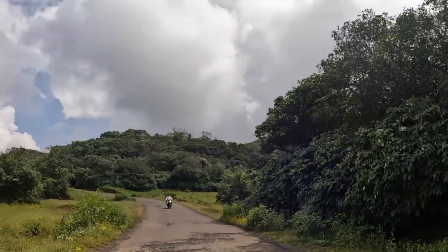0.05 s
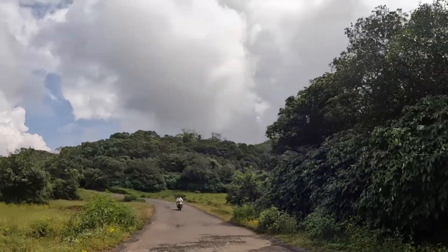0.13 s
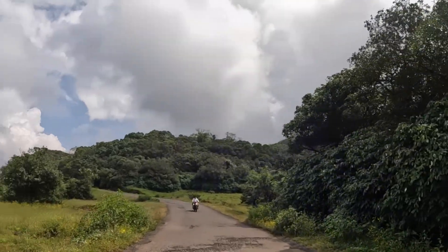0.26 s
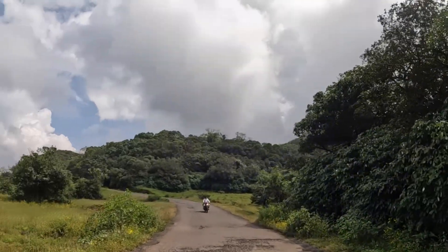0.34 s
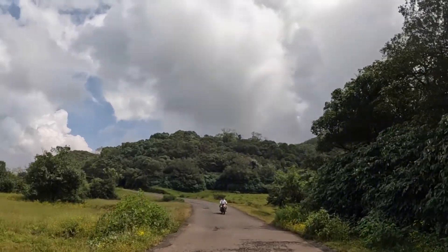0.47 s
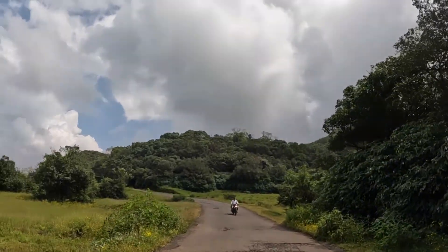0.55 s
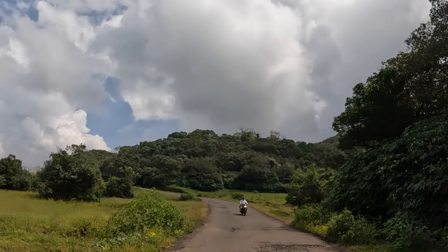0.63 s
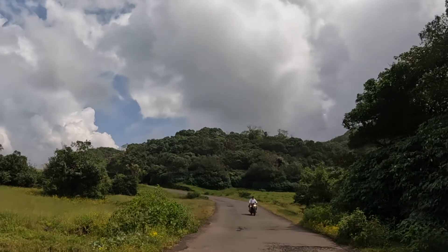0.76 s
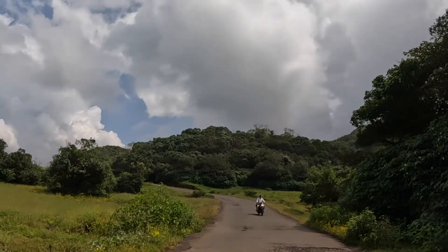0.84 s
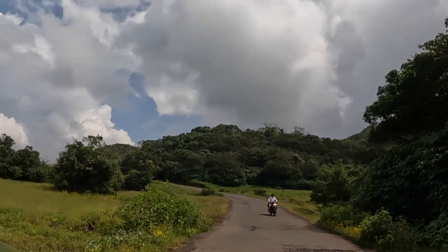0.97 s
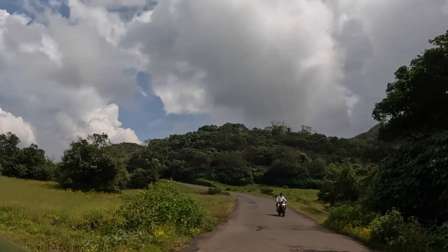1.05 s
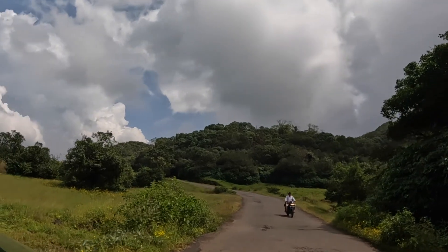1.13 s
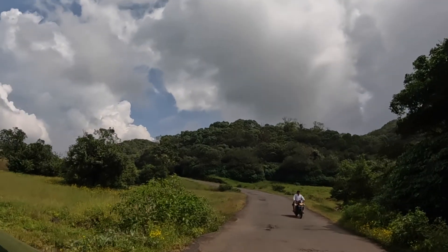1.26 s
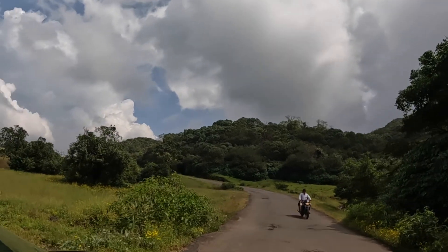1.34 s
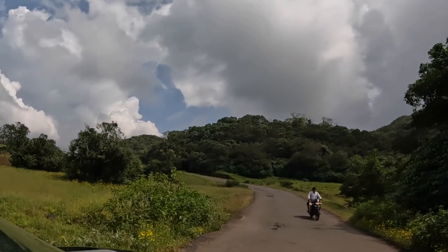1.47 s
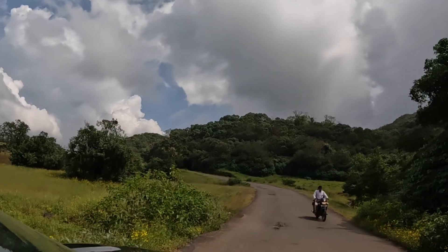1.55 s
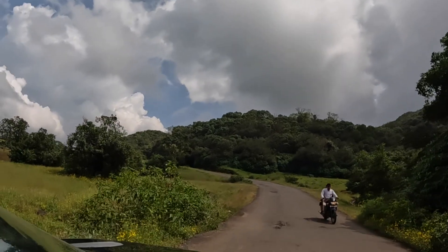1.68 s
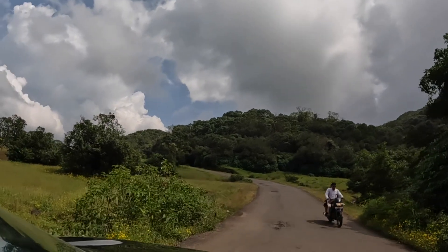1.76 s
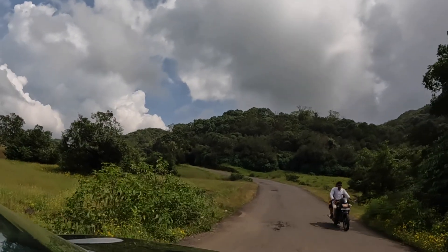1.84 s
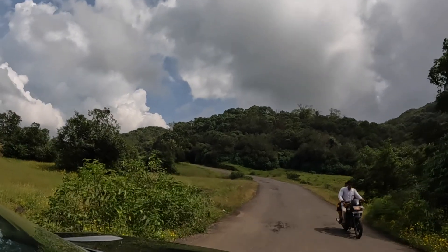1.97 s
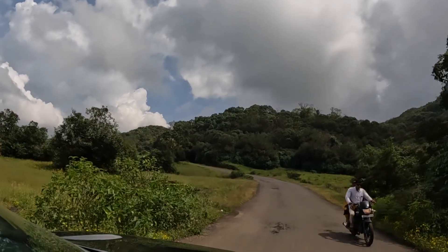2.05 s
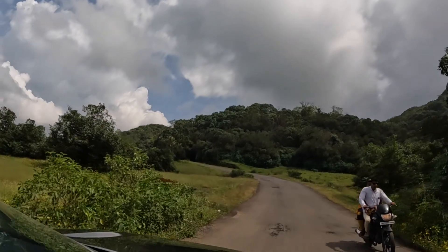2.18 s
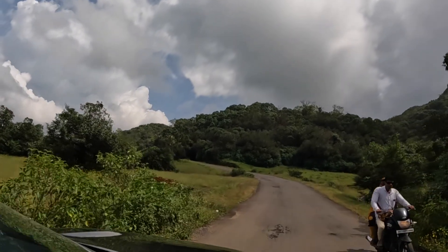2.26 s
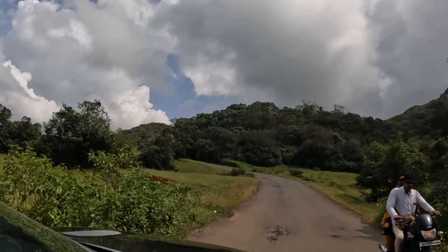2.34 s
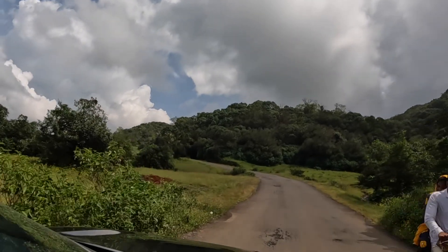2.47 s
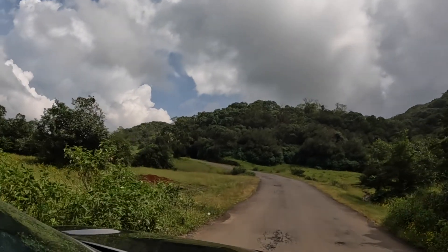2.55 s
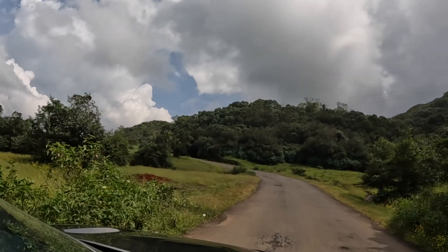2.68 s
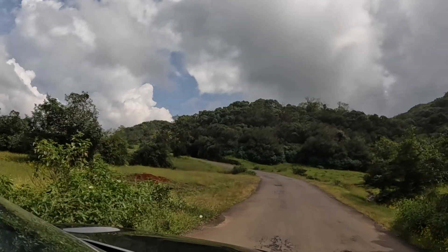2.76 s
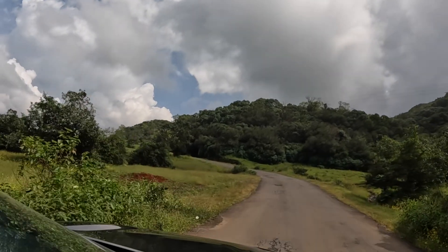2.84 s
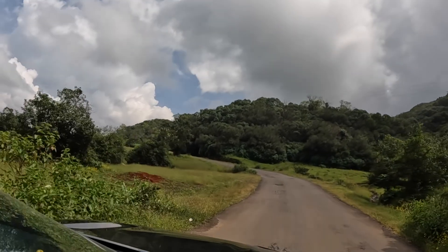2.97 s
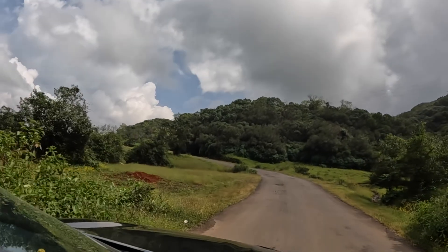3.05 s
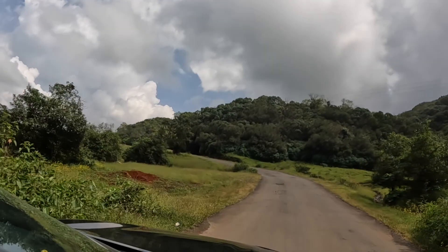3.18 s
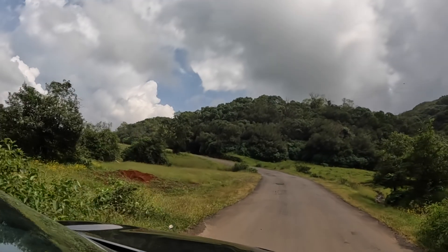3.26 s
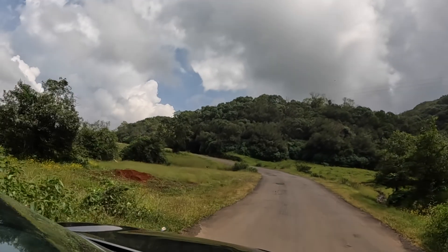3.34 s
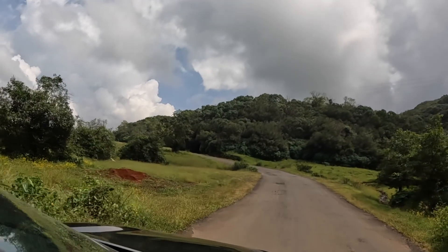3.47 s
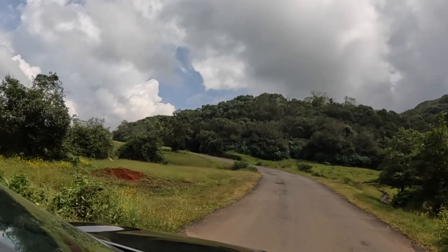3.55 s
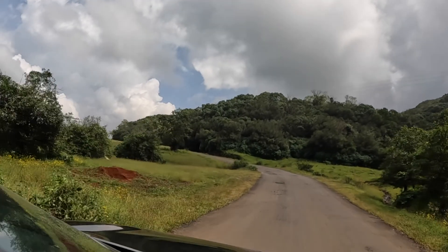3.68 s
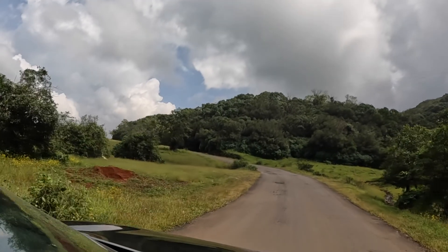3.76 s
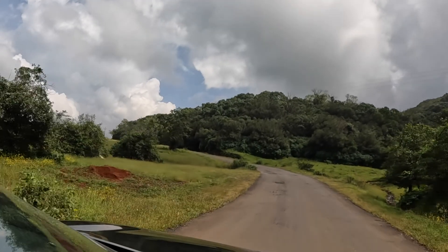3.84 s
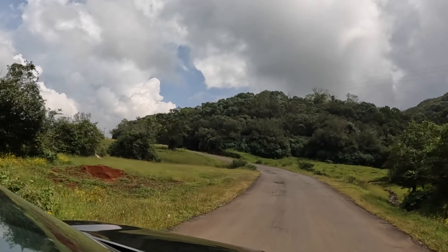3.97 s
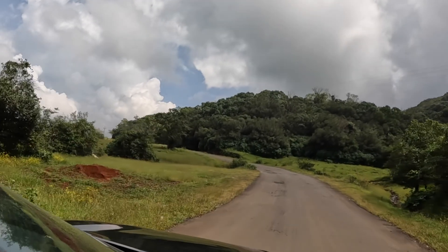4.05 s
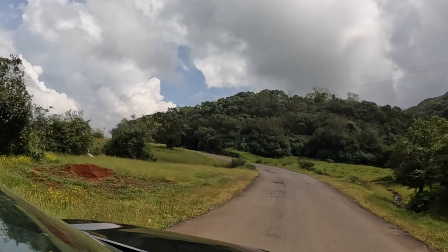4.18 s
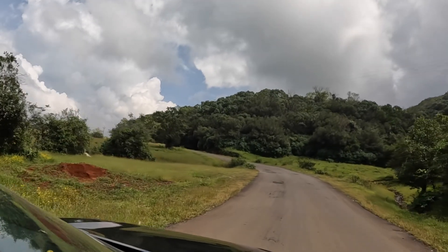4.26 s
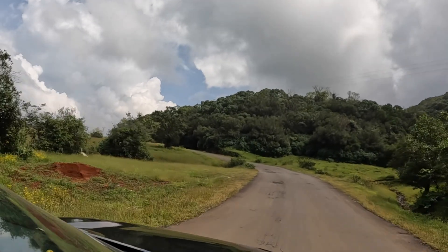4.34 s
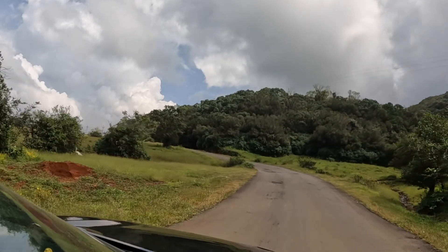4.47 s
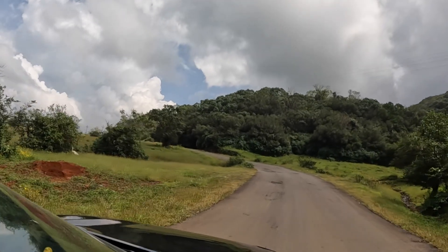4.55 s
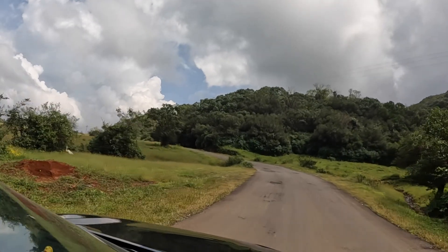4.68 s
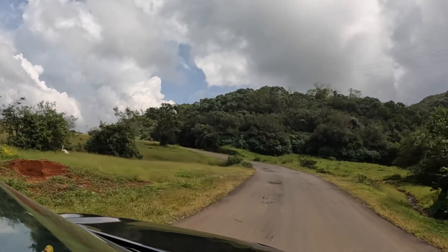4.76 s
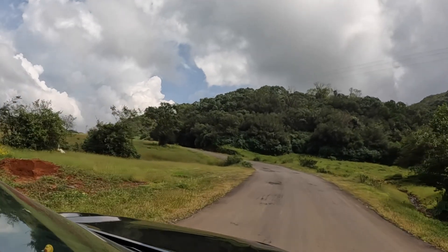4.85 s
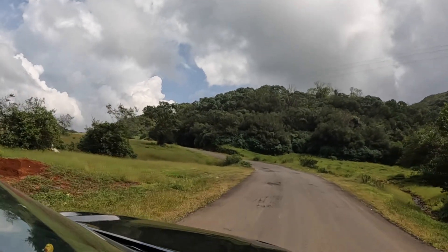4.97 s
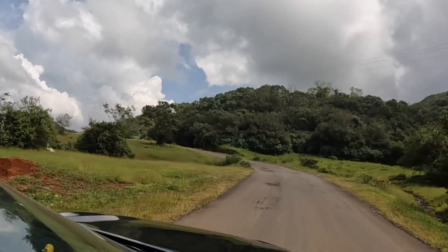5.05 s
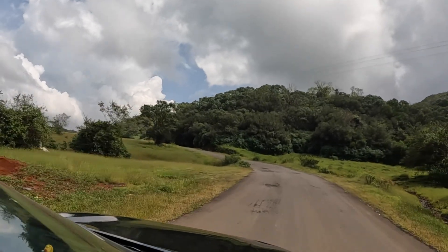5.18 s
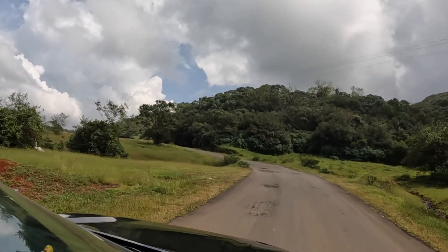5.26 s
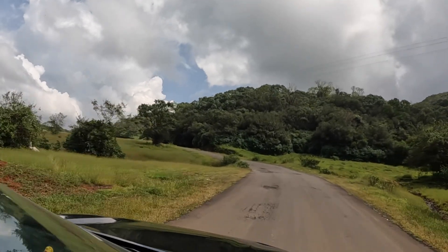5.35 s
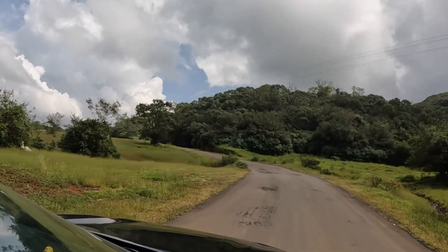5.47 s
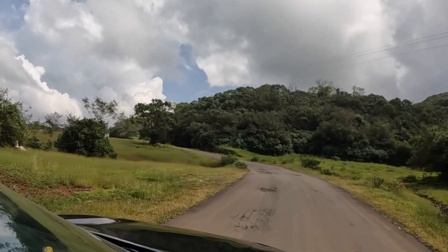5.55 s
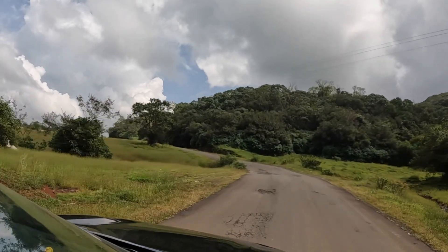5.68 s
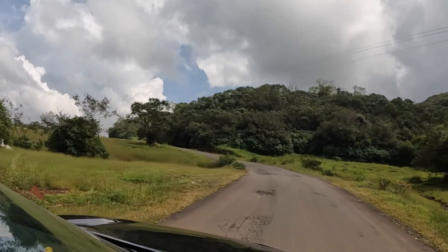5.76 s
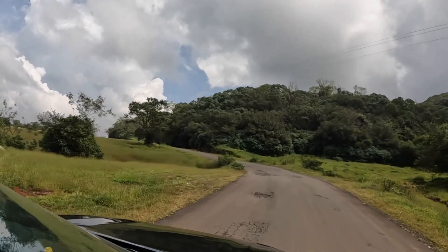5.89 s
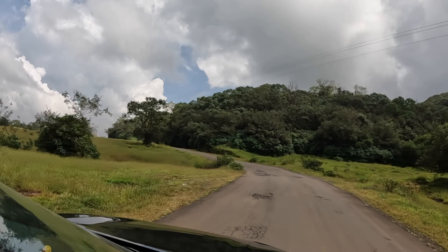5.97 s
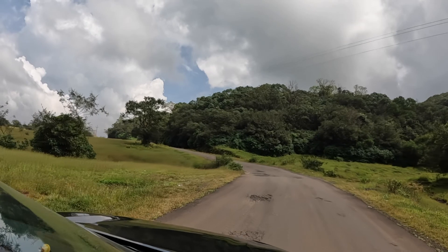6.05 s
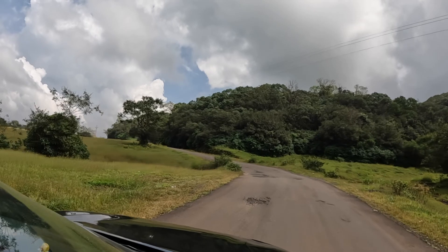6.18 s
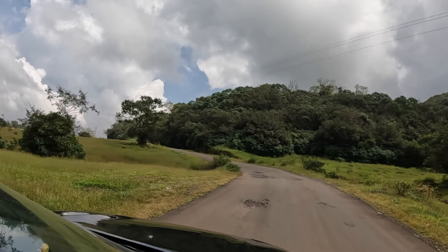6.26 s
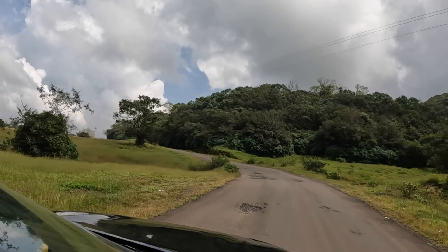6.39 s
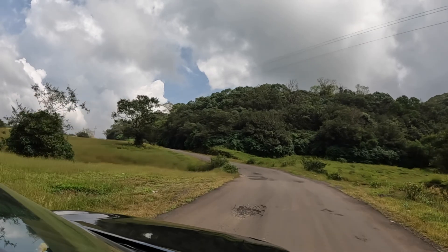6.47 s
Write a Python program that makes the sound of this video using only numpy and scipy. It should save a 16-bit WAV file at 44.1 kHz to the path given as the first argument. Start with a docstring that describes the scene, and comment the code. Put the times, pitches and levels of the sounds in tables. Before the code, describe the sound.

Inside a car on a broken country road, the cabin booms and shudders over bumps above the tyre noise and a low engine hum. Air hisses in gusts through a window gap. Midway a loose panel rattles loudly and a motorcycle sweeps past over crunching grit. The hiss fades, the engine pulls up, and the trim knocks with one brief high squeak. Pops and ticks crackle in the microphones as the car shakes.

```python
"""Inside a car on a broken country road: the cabin booms, tyres roar, the engine pulls up.
Air hisses in the resonances of a window gap; loose trim knocks, taps and rattles, with one high squeak.
Stray air flutters over the two microphones; pops and ticks crackle in them as the car shakes.
A motorcycle sweeps past over loose grit."""
import sys
import numpy as np
from scipy.fft import rfft, irfft, next_fast_len
from scipy.io import wavfile
from scipy.ndimage import map_coordinates

SR = 44100
rng = np.random.default_rng(int(sys.argv[2]) if len(sys.argv) > 2 else 0)


def to_wav(s):
    """Save 16-bit WAV."""
    ch = np.atleast_2d(s).T  # columns
    pcm = np.round(np.clip(ch, -1, 1) * 32767)  # PCM
    wavfile.write(sys.argv[1], SR, pcm.astype(np.int16))


N = 287532

# left-right likeness: f/Hz, correlation
COHERENCE = [(60, 0.99), (120, 1), (200, 1), (600, 0.99), (3000, 0.99), (8000, 1), (15000, 0.97)]
# noise spectra: f/Hz, relative density/dB
SHUDDER_SPECTRUM = [(18, -49), (30, 4), (42, -8), (62, -13.5), (85, -20.5), (120, -30.5), (170, -38),
                    (300, -92)]
RUMBLE_SPECTRUM = [(50, -42), (100, 6), (140, -3), (195, 0), (260, -7.5), (350, -11), (600, -36),
                   (1200, -63)]
ROAR_SPECTRUM = [(150, -9), (300, 1), (400, 2.5), (600, 2), (800, 0), (980, -1.5), (1250, -7), (1600, -15),
                 (2200, -16.5), (4000, -55), (9000, -69)]
CRUNCH_SPECTRUM = [(700, -11), (1800, 4), (3000, 0), (4300, -1.5), (5500, -6), (6400, -9), (7150, -3),
                   (8100, -12.5), (11000, -15), (15000, -16)]
SPRAY_SPECTRUM = [(2000, -12), (4000, 19), (5500, 11.5), (7500, 5), (10000, 7.5), (13000, 6), (14600, -2),
                  (16000, -8)]
EDDY_SPECTRUM = [(15, 6.5), (40, -8), (100, -24), (300, -36), (1000, -43), (8000, -63)]
MOTORCYCLE_SPECTRUM = [(150, -10), (400, 14), (700, 10), (1080, 15), (1400, 6), (2300, 3), (3200, 0.5),
                       (4600, -2.5), (6500, -16), (10000, -15.5), (15000, -20)]

# cabin boom: t/s, level/dB
BOOM_LEVEL = [(0, -13), (.7, -11.5), (.9, -20), (1.1, -10), (1.27, -19.5), (1.45, -12.5), (2.3, -12),
              (2.8, -15.5), (3.3, -15), (4.2, -13.5), (4.8, -14), (5.7, -13.5), (6.5, -12)]
# bumps and potholes: t/s, body shudder/dB, suspension rumble/dB
BUMPS = [(.04, -18, -35), (.35, -22.5, -32.5), (0.549, -15.5, -42), (.76, -31, -36.5), (1.04, -13.5, -34),
         (1.9, -13.5, -32), (2.18, -18, -59), (2.57, -16.5, -54), (2.64, -15.5, -32.5), (2.939, -16.5, -48),
         (3.031, -16, -37), (3.37, -18.5, -38), (4.38, -22, -39.5), (4.579, -20, -33.5), (4.78, -31, -41),
         (5.25, -24, -37.5), (5.36, -25, -38.5), (5.51, -26, -36.5), (6.038, -14, -33), (6.16, -24, -34.5),
         (6.39, -19, -47)]
# road coarseness: t/s, roar/dB
ROAR_LEVEL = [(0, -45.5), (.3, -43.5), (1.04, -41.5), (1.19, -45.5), (1.4, -42.5), (2.35, -44.5),
              (3.0, -48), (3.19, -51), (3.45, -45), (3.7, -46), (3.92, -48), (4.55, -42.5), (5.05, -48.5),
              (5.45, -47), (5.67, -49), (6.12, -42.5), (6.25, -49.5), (6.45, -44.5)]
# tyre treble: t/s, level/dB
CRUNCH_LEVEL = [(0, -52.5), (2.9, -52.5), (3.2, -57.5), (3.76, -52.5), (3.93, -57), (4.25, -54.5),
                (4.68, -54), (5.03, -58), (5.42, -57.5), (5.65, -62.5), (6.1, -53.5), (6.27, -60.5),
                (6.45, -58.5)]
# engine run: t/s, firing rate/Hz, load/dB
ENGINE_RUN = [(0, 38, -59), (2.6, 42, -47.5), (3.0, 42.53, -41), (3.45, 43.39, -42.5), (3.65, 43.86, -50),
              (3.95, 46.16, -40.5), (4.4, 49.39, -37), (5.2, 52.26, -42), (5.75, 54.45, -43),
              (6.07, 55.62, -36), (6.22, 56.46, -50), (6.5, 57.04, -43)]
# engine harmonics: multiple of firing rate, level/dB
FIRING_ORDERS = [(1, 14.5), (2, -0.5), (3, -12), (4, -13.5)]
# cabin resonances: f/Hz, half-width/Hz, lift/dB
CABIN_RESONANCES = [(125.5, 6.6, 4.5), (164.2, 6, 7), (199, 7.6, 6.5)]

# window gap modes: f/Hz, nominal width/Hz, level/dB
GAP_RESONANCES = [(923, 106, -6), (1420, 320, -9), (1910, 57, -11.5), (2234, 150, -6), (2654, 114, -9.5),
                  (2990, 140, -9.5), (3304, 110, -10), (3810, 240, -16), (4660, 190, -17.5)]
# gusts at the gap: t/s, rise/s, fall/s, hiss/dB, fine spray/dB, singing f/Hz
GAP_GUSTS = [(.28, 0.33, 0.45, -48.5, -58, 3840), (.58, 0.13, 0.098, -44, -67, 940),
             (.71, 0.061, 0.15, -41, -69, 1940), (.9, 0.12, 0.23, -45, -69, 970),
             (1.055, 0.46, 0.11, -35.5, -59.5, 960), (1.25, 0.13, 0.51, -39, -72, 2250),
             (1.38, 0.22, 0.5, -35.3, -47.5, 2250), (1.52, .15, 0.23, -47, -57, 2250),
             (1.68, .3, .16, -40.5, -51.5, 2250), (1.85, 0.15, 0.27, -40, -57, 2240),
             (2.01, 0.094, .2, -44.5, -64, 2240), (2.14, 0.16, 0.14, -42, -58, 2200),
             (2.35, 0.12, .15, -48.5, -70, 2600), (2.55, 0.38, 0.24, -44, -60, 2600),
             (3.089, 0.014, 0.032, -40, -45, 930), (3.48, 0.26, 0.17, -51.5, -61, 2630),
             (3.735, 0.052, .15, -67, -60, 3800)]
# upper edge of the hiss: t/s, f/Hz
HISS_EDGE = [(0, 5100), (0.8, 4500), (1.45, 4200), (2.1, 3300), (2.26, 3070), (2.6, 3020), (3.7, 2850)]
# near-whistles: t/s, rise/s, fall/s, level/dB
WHISTLE_SWELLS = [(2.17, .2, .16, -47.5), (2.5, .35, .35, -53), (3.48, .4, .35, -63.5)]
# eddies on the microphones: t/s, rise/s, fall/s, level/dB
EDDY_SWELLS = [(1.45, 0.16, 0.099, -20), (3.06, 0.1, 0.039, -18), (5.2, 0.69, 0.27, -27),
               (5.48, 0.2, 0.17, -19.5)]

# trim taps and a squeak: t/s, level/dB, f/Hz, nominal width/Hz, t60/s
TRIM_TAPS = [(3.239, -40, 550, 150, 0.1), (5.4825, -29, 1120, 600, 0.04), (5.483, -49, 6100, 600, 0.036),
             (5.503, -30, 780, 500, 0.035), (5.507, -45.5, 2440, 80, 0.11),
             (6.031, -46.5, 8900, 1487, 0.054)]
# fastener clicks: t/s, level/dB
FASTENER_CLICKS = [(4.958, -44), (5.622, -38), (5.6908, -43)]
# fastener and trim modes: f/Hz, level/dB, t60/s
FASTENER_MODES = [(1900, -3, .007), (3020, -1, .011), (5000, -10, .007), (6000, -7, .009),
                  (8500, -13, .006)]
TRIM_MODES = [(555, 4, 0.059), (1235, 0.5, 0.052), (1310, 3.5, 0.044), (1816, 4, 0.053), (2510, -10, 0.048),
              (3100, -7, 0.071), (5830, -25, .03)]
# trim knocks: t/s, ring/dB, ring time factor, scrape/dB, scrape t60/s
TRIM_KNOCKS = [(0.0807, -30.5, 0.75, -48, .035), (5.4807, -47, 0.3, -45, 0.046),
               (5.502, -40, 0.25, -47, 0.24)]
# loose panel modes: f/Hz, width/Hz, level/dB
PANEL_MODES = [(434, 300, -7), (690, 50, 3.5), (822, 24, 6), (885, 65, 2), (1178, 50, -2),
               (1610, 1800, -17), (2030, 220, -14), (2656, 220, -5.5), (3300, 290, -15)]
# panel slams: t/s, level/dB, favoured f/Hz
PANEL_SLAMS = [(2.578, -29, 900), (2.593, -28, 1200), (2.6058, -16.5, 850), (2.6095, -18.5, 1200),
               (2.615, -18, 1180), (2.622, -18.5, 875), (2.635, -19, 2200), (2.6415, -15, 810),
               (2.649, -19.5, 1180), (2.659, -20, 760), (2.675, -29, 720), (2.722, -31, 700)]
# clearest tick flurries: t/s, level/dB
TICK_FLURRIES = [(2.023, -19.5), (2.249, -22), (2.444, -21.5), (2.686, -17.5), (3.12, -23), (3.148, -27),
                 (3.22, -27), (3.334, -30), (3.868, -25), (3.98, -28), (4.172, -25.5), (4.797, -28.5),
                 (5.001, -30), (5.102, -30), (5.128, -29), (5.311, -30), (5.378, -23.5), (5.623, -27),
                 (5.691, -27.5), (5.72, -31.5), (5.82, -22.5), (6.204, -25.5), (6.228, -29.5), (6.293, -32),
                 (6.341, -27), (6.401, -24), (6.421, -27), (6.439, -25.5)]
# microphone pops: t/s, left/dB, right/dB, left lag/s
MIC_POPS = [(1.1586, -8.5, -5.5, .0027), (1.4086, -47, -10.5, 0), (1.5215, -8.5, -50, 0),
            (1.9523, -7, -5, .0017), (2.1766, -7.5, -7.5, .00195), (2.659, -11, -8.5, .002),
            (3.1001, -5.5, -30, 0), (3.5095, -8, -7.5, .00185), (3.822, -9, -6.5, .0019),
            (4.7275, -42, -8.5, 0), (4.9337, -10, -5.5, .00215), (5.5498, -9, -52, 0),
            (6.1829, -5.5, -5, .00125)]
# grit under the motorcycle: t/s, rise/s, fall/s, level/dB, f/Hz
GRIT_BURSTS = [(2.793, 0.03, 0.032, -31.5, 900), (2.835, .02, .03, -33, 1150),
               (2.812, 0.025, 0.03, -34, 3000), (2.818, 0.022, 0.055, -28.5, 510),
               (2.853, .025, 0.024, -27.5, 430), (2.857, .025, 0.025, -38, 3400),
               (2.894, 0.043, 0.031, -35, 2070), (2.918, 0.027, 0.05, -32, 474),
               (2.935, .02, .025, -34, 1050), (2.977, .02, 0.03, -40, 1100),
               (3.003, 0.015, .035, -44, 1600), (3.05, 0.041, 0.1, -39, 900)]


def amp(db):
    """Decibels to gain."""
    return 10 ** (np.asarray(db) / 20)


def unit(x):
    """Scale to rms 1."""
    return x / np.sqrt(np.mean(x ** 2) + 1e-20)


def clock(samples=N):
    """Sample times in seconds."""
    return np.arange(samples) / SR


def along(points, hz):
    """Interpolate (f/Hz, value) points on a log axis."""
    knots_hz, values = np.transpose(points)
    return np.interp(np.log(hz + 1), np.log(knots_hz + 1), values)


def curves(rows):
    """One per-sample curve for each column after the time."""
    times_s, *columns = np.transpose(rows)
    return [np.interp(clock(), times_s, column) for column in columns]


def swell(peak_s, rise_s, fall_s):
    """Gain peaking at 1: up 20 dB in rise_s, down 20 dB in fall_s."""
    t = clock() - peak_s
    return amp(-20 * np.maximum(-t / rise_s, t / fall_s))


def wobble(rate_hz):
    """Smooth random curve, rate_hz knots a second."""
    knots = rng.standard_normal(int(N * rate_hz / SR) + 4)
    return map_coordinates(knots, [np.arange(N) * rate_hz / SR])


def filtered(x, response):
    """Apply a complex frequency response."""
    size = next_fast_len(N + SR // 2)
    return irfft(rfft(x, size) * response(np.fft.rfftfreq(size, 1 / SR)), size)[..., :N]


def resonance(f, centre_hz, width_hz):
    """Causal band-pass response."""
    return 1j * f * width_hz / (centre_hz ** 2 - f ** 2 + 1j * f * width_hz)


def bell(offset, width):
    """Gaussian weight, 1 at zero offset."""
    return np.exp(-(offset / width) ** 2)


def noise_pair():
    """White noise at two close microphones, nearly alike."""
    def mid_side(f):
        angle = np.arccos(np.clip(along(COHERENCE, f), -1, 1)) / 2
        return np.array([np.cos(angle), np.sin(angle)])
    mid, side = filtered(rng.standard_normal((2, N)), mid_side)
    return np.array([mid + side, mid - side])


def rush(spectrum):
    """Coloured stereo noise, rms 1."""
    return unit(filtered(noise_pair(), lambda f: amp(along(spectrum, f))))


def add(track, at_s, sound):
    """Mix a sound into a track."""
    start = max(round(at_s * SR), 0)
    span = track[start:start + len(sound)]
    span += sound[:len(span)]


def ride(boom_hz=21, sway_db=2, upset_db=-15, shake_db=-24.5, shake_db_per_s=0.11):
    """The lowest cabin mode booms; bumps break it up, shake the body and rumble in the suspension."""
    t = clock()
    bump_power = sum(np.outer(amp(levels_db), swell(at_s, rise_s=0.16, fall_s=0.11)) ** 2
                     for at_s, *levels_db in BUMPS)
    shudder, rumble = np.sqrt(bump_power)
    boom = np.sqrt(2) * np.sin(2 * np.pi * np.cumsum(boom_hz * (1 + 0.1402 * wobble(12))) / SR)
    boom_gain = amp(curves(BOOM_LEVEL)[0] + sway_db * wobble(7)) * np.minimum(t / 0.05, 1)
    boom_gain /= np.hypot(1, shudder / amp(upset_db))
    shudder = np.hypot(shudder, amp(shake_db + shake_db_per_s * t))  # grows with speed
    rumble = np.hypot(rumble, amp(curves(ROAR_LEVEL)[0] + 3.5))  # follows the road
    return boom_gain * boom + shudder * rush(SHUDDER_SPECTRUM) + rumble * rush(RUMBLE_SPECTRUM)


def tyres(coarse_db=1, crunch_gain_db=-1, patchy_db=1.88, grain_db=2):
    """Tyres roar on coarse asphalt; the tread crunches over fine grit."""
    roar = amp(curves(ROAR_LEVEL)[0] + coarse_db * wobble(60)) * rush(ROAR_SPECTRUM)
    crunch_db = curves(CRUNCH_LEVEL)[0] + crunch_gain_db + patchy_db * wobble(25)
    crunch = unit(rush(CRUNCH_SPECTRUM) * amp(grain_db * wobble(350)))
    return roar + amp(crunch_db) * crunch


def engine(unsteady_db=2, imbalance=0.24, waver_hz=9):
    """Low orders pass the bulkhead, lifted by load and cabin modes; unequal cylinders make them beat."""
    firing_hz, load_db = curves(ENGINE_RUN)
    phase = 2 * np.pi * np.cumsum(firing_hz) / SR + 0.12 * wobble(10)
    out = np.zeros(N)
    for order, db in FIRING_ORDERS:
        lift_db = sum(peak_db / (1 + ((order * firing_hz - hz) / half_width_hz) ** 2)
                      for hz, half_width_hz, peak_db in CABIN_RESONANCES)
        beat = 1 + imbalance * np.sin(phase / 4 + rng.uniform(0, 2 * np.pi))
        gain = amp(load_db + db + lift_db + unsteady_db * wobble(waver_hz))
        out += gain * beat * np.sin(order * phase + rng.uniform(0, 2 * np.pi))
    return np.sqrt(2) * out


def draught(steady_db=-52.5, fade_from_s=1.6, lull_s=1.155, sing_db=4.5, flutter_db=1.34, leak=0.035):
    """Gusts hiss in the window gap's modes, with one lull; upper modes fade as the jet slows."""
    t = clock()
    edge_hz, = curves(HISS_EDGE)
    *_, hiss_db, spray_db, sung_hz = np.transpose(GAP_GUSTS)
    gust_power = np.array([swell(*gust[:3]) ** 2 for gust in GAP_GUSTS])
    steady = amp(steady_db - 20 * np.maximum(t - fade_from_s, 0) / 0.53)
    lull = 1 - np.exp(-((t - lull_s) / 0.078) ** 4)
    hiss = np.zeros(N)
    for hz, width_hz, db in GAP_RESONANCES:
        mode = unit(filtered(rng.standard_normal(N), lambda f: resonance(f, hz, 2 * width_hz) ** 2))
        mode = map_coordinates(mode, [np.cumsum(1 + 0.012 * wobble(7))], mode="mirror")  # pitch drift
        lift_db = sing_db * sum(bell(hz - k * sung_hz, 150) for k in (1, 2))
        flow = np.sqrt(amp(hiss_db + lift_db) ** 2 @ gust_power + steady ** 2)
        rolloff = leak + (1 - leak) / np.sqrt(1 + (hz / edge_hz) ** 30)
        edge_db = 4 * bell(hz - edge_hz + 350, 350)  # the mode just under the edge nearly whistles
        hiss += amp(db + edge_db + wobble(4.94)) * rolloff * flow * mode
    spray = np.sqrt(amp(spray_db) ** 2 @ gust_power) * rush(SPRAY_SPECTRUM)
    return (lull * hiss + spray) * amp(flutter_db * wobble(44.75))


def whistle(below_edge_hz=150, width_hz=100):
    """The jet almost whistles: a narrow, breathy band sliding down with the hiss edge."""
    edge_hz, = curves(HISS_EDGE)
    breath = unit(filtered(rng.standard_normal((2, N)), lambda f: 1 / (1 + (f / width_hz) ** 2)))
    phase = 2 * np.pi * np.cumsum(edge_hz - below_edge_hz) / SR
    gain = sum(amp(db) * swell(*timing_s) for *timing_s, db in WHISTLE_SWELLS)
    return gain * (breath[0] * np.cos(phase) + breath[1] * np.sin(phase))


def sizzle(level_db=-63, centre_hz=14600, width_hz=1700, flicker_db=4):
    """A thin, flickering band swells and fades above the hiss."""
    band = filtered(noise_pair(), lambda f: resonance(f, centre_hz, width_hz) ** 3)
    gain = amp(level_db) * swell(peak_s=2.12, rise_s=3.4, fall_s=1.5)
    return gain * unit(band * amp(flicker_db * wobble(130)))


def eddies():
    """Stray air tumbles over the microphones: low flutter, independent on each side."""
    gain = sum(amp(db) * swell(*timing_s) for *timing_s, db in EDDY_SWELLS)
    return gain * unit(filtered(rng.standard_normal((2, N)), lambda f: amp(along(EDDY_SPECTRUM, f))))


def trim_taps(attack_s=0.00048):
    """Trim gives short band-limited knocks and rings, plus one high squeak."""
    out, t = np.zeros(N), clock(SR // 5)
    for at_s, db, hz, width_hz, t60_s in TRIM_TAPS:
        band = unit(filtered(rng.standard_normal(N), lambda f: resonance(f, hz, width_hz) ** 2))
        envelope = amp(db - 60 * t / t60_s) * (1 - np.exp(-t / attack_s))
        add(out, at_s, envelope * band[SR:SR + len(t)])
    return out


def clicks(flight_s=0.0015, loss_db=4, contacts=3):
    """A loose fastener makes quick contacts, each with a short, bright ring."""
    out, t = np.zeros(N), clock(SR // 20)
    for at_s, db in FASTENER_CLICKS:
        for k in range(contacts):
            ring = sum(amp(mode_db + rng.normal(0, 1.7) - 60 * t / t60_s)
                       * np.sin(2 * np.pi * hz * rng.normal(1, 0.017) * t)
                       for hz, mode_db, t60_s in FASTENER_MODES)
            add(out, at_s + flight_s * (k + rng.uniform(-0.3, 0.3)), amp(db - loss_db * k) * ring)
    return out


def knocks(tap_gain_db=-2, cutoff_hz=2500):
    """Plastic trim taps, with new mode strengths each time, and scrapes as it slides back."""
    taps, scrape_gain, t = np.zeros(N), np.zeros(N), clock(SR // 4)
    for at_s, db, ring_factor, scrape_db, scrape_t60_s in TRIM_KNOCKS:
        ring = sum(amp(mode_db + rng.uniform(-1.4, 3.6) - 60 * t / (t60_s * ring_factor))
                   * np.sin(2 * np.pi * hz * t) for hz, mode_db, t60_s in TRIM_MODES)
        add(taps, at_s, amp(db + tap_gain_db) * ring)
        add(scrape_gain, at_s, amp(scrape_db - 60 * t / scrape_t60_s))
    rough = noise_pair() * amp(1.9 * wobble(910))
    friction = unit(filtered(rough, lambda f: 1 / (1 + 1j * f / cutoff_hz)))
    return taps + scrape_gain * friction


def rattle(gain_db=-1, chatter_t60_s=0.052, chatter_db=3, strike_db=-5, rasp_db=-6, favour_db=4):
    """A loose panel slams repeatedly: a hard strike, then chatter, favouring one resonance region."""
    out, t = np.zeros(N), clock(SR // 4)
    f = np.fft.rfftfreq(len(t), 1 / SR)
    damping = 1 / (1 + 1j * f / 4500) ** 2
    decay = amp(-60 * t / chatter_t60_s)
    decay_rms = np.sqrt(np.mean(decay ** 2))
    for at_s, db, favoured_hz in PANEL_SLAMS:
        chatter = decay * rng.standard_normal(len(t)) * amp(chatter_db * wobble(647)[:len(t)])
        strike = rng.choice([-1, 1]) * amp(strike_db) * np.linalg.norm(chatter)
        force = (rfft(chatter) + strike) * damping
        panel = sum((-1) ** k * amp(mode_db + favour_db * bell(hz - favoured_hz, 350))
                    * resonance(f, hz, width_hz) for k, (hz, width_hz, mode_db) in enumerate(PANEL_MODES))
        ring = unit(irfft(force * panel, len(t)))
        rasp = unit(irfft(force * resonance(f, 1260, 1600), len(t)))
        add(out, at_s, amp(db + gain_db) * decay_rms * (ring + amp(rasp_db) * rasp))
    return out


def pop_shape(rise_s, settle_s, swing, swing_hz, swing_decay_s):
    """A sudden step that swings back and settles."""
    t = clock(SR // 30)
    backswing = swing * np.exp(-t / swing_decay_s) * np.sin(2 * np.pi * swing_hz * t)
    return (np.exp(-t / settle_s) - backswing) * (1 - np.exp(-t / rise_s))


def ticks(gain_db=1, spread_s=0.005, loss_db=2.5, per_flurry=4, faint_from_s=1.5, faint_count=45):
    """Flurries of tiny microphone pops, scattered differently on each side, with faint ones between."""
    out = np.zeros((2, N))
    shape = pop_shape(rise_s=28e-6, settle_s=0.00035, swing=0.19, swing_hz=300, swing_decay_s=0.00072)
    faint_s = rng.uniform(faint_from_s, N / SR, faint_count)
    faint_db = rng.normal(-38, 3, faint_count)
    for at_s, db in [*TICK_FLURRIES, *zip(faint_s, faint_db)]:
        for side in out:
            for k, offset_s in enumerate(spread_s * (rng.random(per_flurry) - 0.5)):
                add(side, at_s + offset_s, rng.choice([-1, 1]) * amp(db + gain_db - loss_db * k) * shape)
    return out


def pops(pressure, gain_db=0.5):
    """Pops strike one microphone, or both a moment apart, against the cabin's pressure swing."""
    out = np.zeros((2, N))
    shape = pop_shape(rise_s=20e-6, settle_s=0.002, swing=3.4, swing_hz=208, swing_decay_s=0.00074)
    for at_s, left_db, right_db, lag_s in MIC_POPS:
        pop = -np.sign(pressure[round(at_s * SR)]) * amp(gain_db) * shape
        add(out[0], at_s + lag_s, amp(left_db) * pop)
        add(out[1], at_s, amp(right_db) * pop)
    return out


def grit(gain_db=-1, grains_per_s=1800, spread_db=2.6, width_ratio=0.51):
    """Loose grit crunches beside the car in bursts, each a dense shower of dull grains."""
    out = np.zeros(N)
    for *timing_s, db, hz in GRIT_BURSTS:
        impulses = (rng.random(N) < grains_per_s / SR) * rng.choice([-1, 1], N)
        grains = impulses * amp(spread_db * rng.standard_normal(N))
        shower = filtered(grains, lambda f: resonance(f, hz, width_ratio * hz) * resonance(f, 840, 4500))
        out += amp(db + gain_db) * swell(*timing_s) * unit(shower)
    return out


def motorcycle(pass_s=2.825, pass_db=-36.5, gap_m=1.56, closing_m_per_s=13.2, firing_hz=27):
    """Tyres and exhaust sweep by in a gritty rush, throbbing with the single cylinder."""
    t = clock()
    distance_m = np.hypot(gap_m, closing_m_per_s * (t - pass_s))
    ahead_s, behind_s = 2.31, 3.09  # the car's body screens it outside this span
    screen_db = 45 * np.maximum(ahead_s - t, 0) + 150 * np.maximum(t - behind_s, 0)
    phase = 2 * np.pi * np.cumsum(firing_hz * (1 + 0.075 * wobble(9.1))) / SR
    throb = 1 + 0.25 * np.sin(phase)
    gritty = unit(rush(MOTORCYCLE_SPECTRUM) * amp(2 * wobble(300) + 1.7 * wobble(45)))
    return amp(pass_db - screen_db) * gap_m / distance_m * throb * gritty


def scene():
    """Stereo mix behind the windscreen."""
    car = ride() + tyres() + engine() + draught() + whistle() + sizzle()
    car += rattle() + knocks() + clicks() + trim_taps()
    return car + motorcycle() + grit() + pops(pressure=car[0]) + ticks() + eddies()


def record(dry, low_hz=8, top_hz=15600):
    """Band limit: drops the deepest sway, cuts the top treble steeply."""
    return filtered(dry, lambda f: (f > low_hz) / np.sqrt(1 + (f / top_hz) ** 90))


dry = scene()
out = record(dry)
to_wav(out)
```